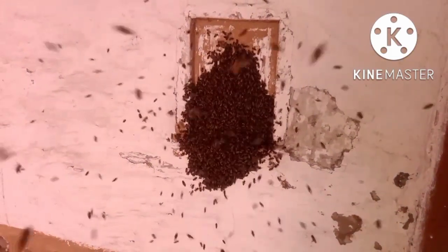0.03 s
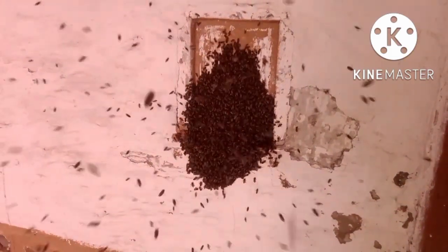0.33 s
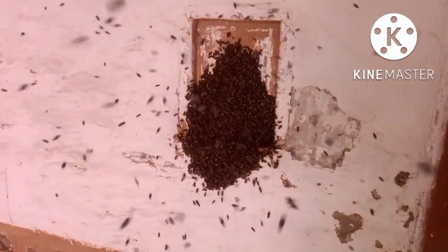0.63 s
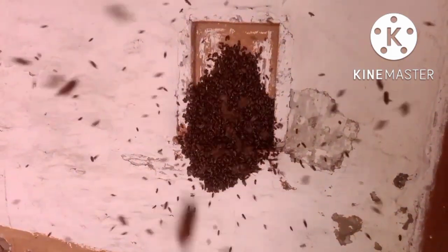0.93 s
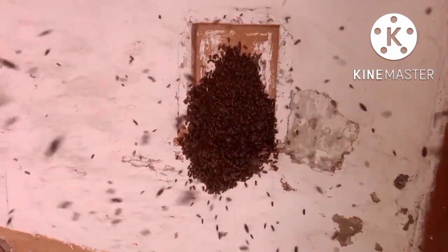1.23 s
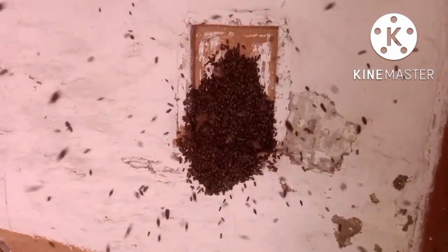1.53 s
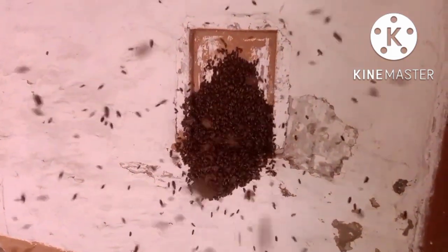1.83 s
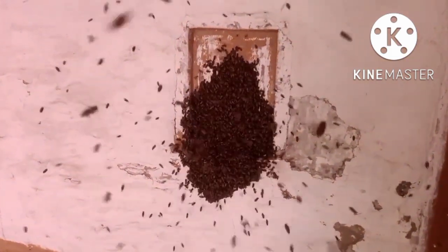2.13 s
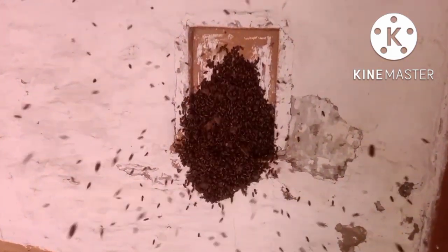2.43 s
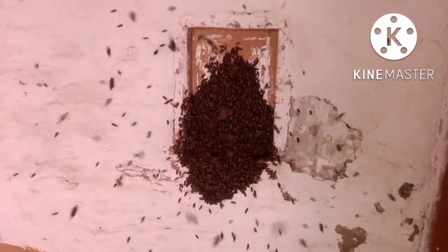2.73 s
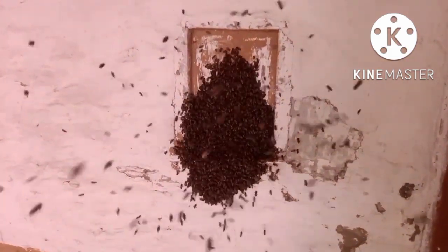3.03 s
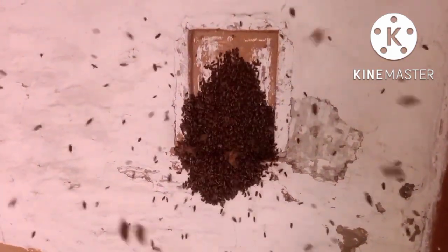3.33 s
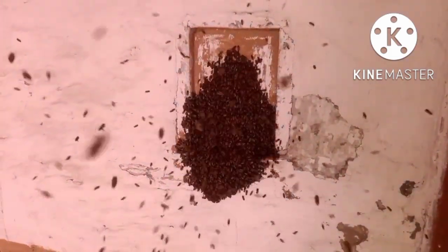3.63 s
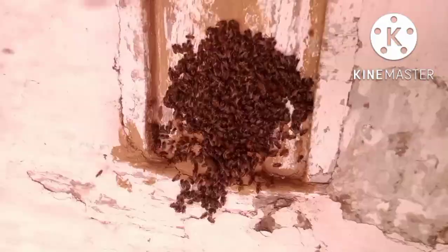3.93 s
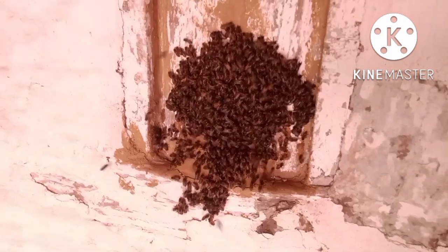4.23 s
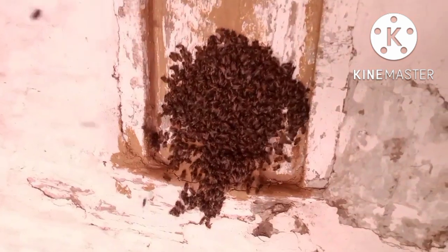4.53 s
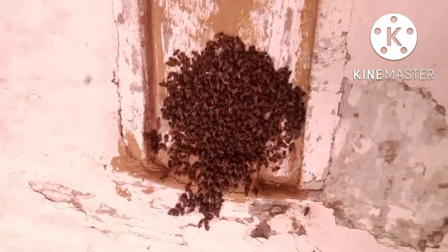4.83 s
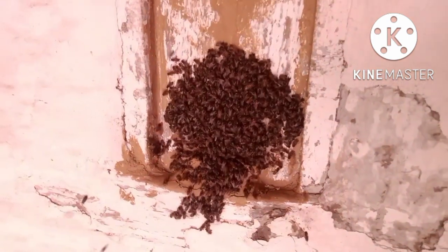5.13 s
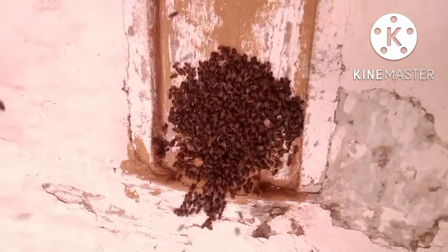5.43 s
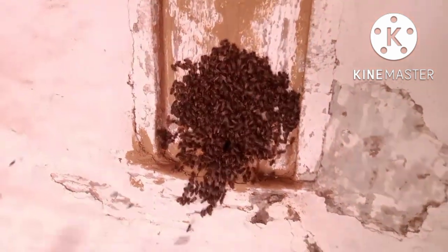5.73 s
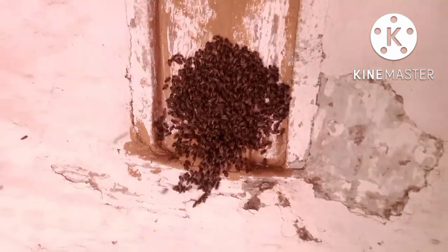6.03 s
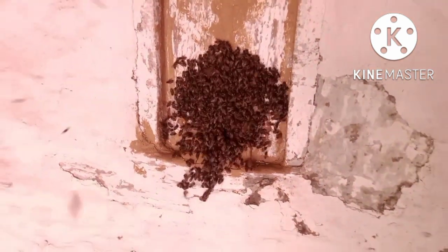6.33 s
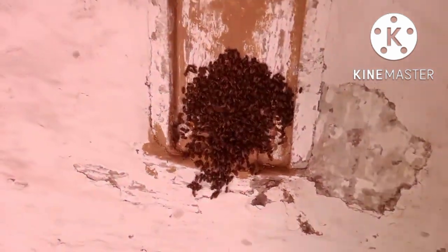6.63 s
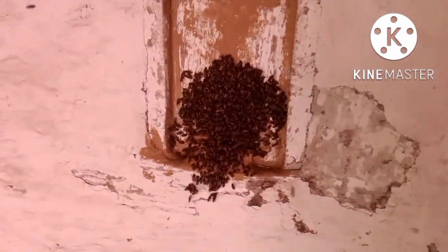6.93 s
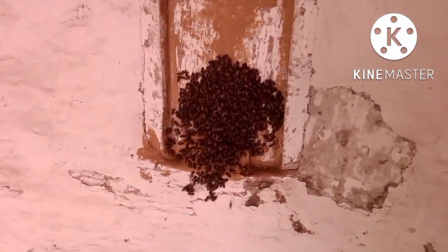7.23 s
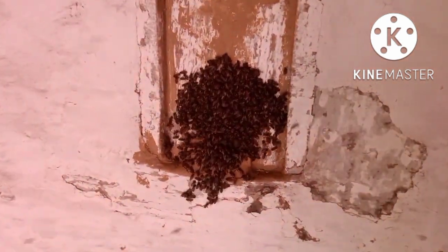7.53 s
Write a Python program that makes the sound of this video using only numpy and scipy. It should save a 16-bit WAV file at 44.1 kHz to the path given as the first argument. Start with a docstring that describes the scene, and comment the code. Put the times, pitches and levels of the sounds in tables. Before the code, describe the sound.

Outdoors by a wall, dozens of bees blend into one wavering drone with a raspy buzz on top. Single bees whine past in quick swells, and two graze the microphone with a small hiss and a low bump. Near the middle the buzzing cuts out for an instant, then returns softer and carries on with smaller swells. Low, faint outdoor air lies underneath.

```python
"""A swarm of honeybees hums around its cluster on a house wall.
Dozens of wingbeats, each at its own wandering rate, superpose into a tone, its octave and a raspy buzz.
The hum swells often, a few times with a close bee's whine or hiss; twice wing wash bumps the microphone.
Near 4 s the sound breaks off and fades back in with the swarm quieter. Outdoor air murmurs beneath."""
import sys
import numpy as np
from scipy import signal
from scipy.fft import rfft, irfft, next_fast_len
from scipy.io import wavfile

SR = 44100
rng = np.random.default_rng(int(sys.argv[2]) if len(sys.argv) > 2 else 0)


def transcribe(signal):
    """Save signal, clipped to [-1, 1], as a 16-bit WAV file at the path in sys.argv[1]."""
    frames = np.atleast_2d(signal).T
    limited = np.clip(frames, -1, 1)
    pcm = np.round(limited * 32767).astype(np.int16)
    wavfile.write(sys.argv[1], SR, pcm)


N = 339129
STEP = 16  # audio samples per point of the slow flight curves
TIME = np.arange(N) / SR
SLOW_TIME = np.arange(N // STEP + 2) * STEP / SR
CHANGE_S = 3.98  # the loud first part gives way to the quiet second part

# Hum of the crowd: time_s, tone_db, octave_db
HUM_LEVELS = [(0, -36.5, -32), (1.7, -34, -31), (2.3, -35.5, -33), (2.65, -33, -30.5), (3.9, -37, -32.5),
              (4.2, -44.5, -38.5), (5.4, -42.5, -38.5), (6.1, -45.5, -39.5), (7.69, -42, -40.7)]
# Loudest swells of the swarm's hum, a few with a close bee's whine:
# centre_s, pitch_hz, half_length_s, tone_db, octave_db, whine_db
HUM_SWELLS = [ (0.421, 280, 0.02, -33.5, -30, -46), (0.51, 280.3, 0.021, -29, -27.5, -48),
              (0.629, 283, .025, -33, -33, -49), (1.10, 281.6, 0.014, -27.5, -36.5, -38),
              (1.23, 283, 0.029, -49, -39, -38), (1.42, 276, .025, -30, -34, -42),
              (1.502, 275.8, .028, -31, -27, -38), (1.672, 281, 0.035, -30, -28.5, -41),
              (1.909, 262, 0.023, -23.5, -29, -47), (2.019, 268, .025, -22, -34, -36),
              (2.079, 278, .03, -27, -29, -37), (2.472, 279.5, 0.024, -28.5, -28.5, -45),
              (2.598, 277, 0.017, -39, -25, -47), (2.909, 278.6, 0.026, -21, -23.5, -29),
              (2.972, 286, 0.018, -23, -26, -39), (3.209, 286, 0.025, -25.5, -35, -45),
              (3.29, 279, .02, -42, -28, -44), (3.699, 277, 0.014, -31, -27.5, -47),
              (3.847, 285.2, 0.024, -29.5, -32, -39), (4.45, 279, 0.021, -37, -32.5, -52),
              (4.68, 272, 0.031, -40.5, -34, -47), (5.051, 275.6, 0.02, -49, -37, -49),
              (5.31, 284, .035, -38, -42, -48), (5.439, 275.4, 0.016, -42, -33.5, -50),
              (5.768, 282, 0.02, -31, -43, -44), (5.959, 274, 0.03, -38, -40, -50),
              (6.039, 280, .03, -50, -37.5, -42), (6.327, 283, 0.025, -37, -33, -51),
              (6.669, 280, 0.026, -36, -40, -53), (6.899, 272, 0.023, -45, -36.5, -50),
              (7.021, 282, .045, -37.5, -43, -56), (7.662, 282, 0.023, -35.5, -38, -46), ]
# Overtones of the whine: harmonic_number, relative_db
WHINE_OVERTONES = [(3, 0), (4, 0), (5, 5), (6, -1), (7, -10), (8, -5), (9, -16), (10, -13), (11, -21),
                   (12, -14)]
# Rasp of the wings: time_s, buzz_db, fizz_db
RASP_LEVELS = [(0, -30, -51.5), (3.9, -30, -51), (4.2, -37, -56.5), (4.9, -36.5, -56), (5.8, -37.5, -57.5),
               (7.69, -38, -58.3)]
# Midrange spectrum of the wing strokes in each part: frequency_hz, relative_db
BUZZ_FIRST = [(700, -2), (830, -2.5), (1100, -1), (1400, 0), (1700, -2.5), (2000, -3.5), (2600, -6),
              (3600, -6.5), (4100, -11.5), (4800, -22), (5600, -43.5), (7000, -52.5)]
BUZZ_SECOND = [(700, 1.5), (830, -2.5), (1100, -2), (1450, -1), (1900, -2), (2300, -7), (3000, -7.5),
               (3800, -6), (4300, -10.5), (4900, -18.5), (5600, -35.5), (7000, -43.5)]
# Treble spectrum of the wing strokes in each part: frequency_hz, relative_db
FIZZ_FIRST = [(5000, -6), (6200, -6.5), (7200, -0.5), (8000, 1), (9000, -2.5), (10000, -6.5), (11500, -6.5),
              (12300, -7.5), (13600, -2), (14500, -11), (15400, -6.5)]
FIZZ_SECOND = [(5000, -16), (6200, -11.5), (7200, 0), (8000, 1.5), (9200, 0.5), (10000, -3.5),
               (11300, -5.5), (12200, -12), (13600, -3), (14500, -13), (15400, -4.5)]
# Hiss of bees grazing the microphone: centre_s, level_db, half_length_s, brightest_hz
WING_SWISHES = [(1.97, -51.5, .05, 10000), (2.91, -54, .025, 8500), (6.27, -63, .085, 13000)]
# Wing wash pulses, before the port's leak: centre_s, peak_db, centre_to_peak_s
WASH_PUFFS = [(1.942, -17.5, 0.00093), (1.9604, -25, 0.00075), (1.9735, -36, .0015), (1.984, -40, 0.0017),
              (2.013, -36, .0012), (2.9122, -33, .0014), (2.926, -13.5, 0.0015)]
# Spectrum of the outdoor air in each part: frequency_hz, relative_db
AIR_FIRST = [(20, -34), (45, -13), (80, -3), (120, -5.5), (200, 5.5), (370, 4), (700, 2.5), (1500, -34)]
AIR_SECOND = [(20, -26), (45, -13), (80, -3), (120, 0.5), (200, -1), (370, 1), (700, -6), (1500, -29)]


def flight(usual_hz=271, spreads_hz=(16.2, 17.5), sag_hz=1.6, nearness_db=3.5, bees=80):
    """Random modulation: effort sets each bee's wingbeat rate and phase, nearness its amplitude."""
    cruise, dart, jitter = wander(.35, bees), wander(3.5, bees), wander(22.03, bees)
    effort = unit_rms(cruise + .65 * dart + .12 * jitter)
    spread_hz = np.where(SLOW_TIME < CHANGE_S, *spreads_hz)
    beat_hz = usual_hz + spread_hz * effort - sag_hz * effort ** 2  # wings slow more easily than speed up
    cycles = np.cumsum(beat_hz, axis=1) * STEP / SR + rng.random((bees, 1))
    return beat_hz, cycles, gain_of(nearness_db * wander(2.2, bees))


def hum(beat_hz, cycles, amplitude, hover_hz=285, hover_width_hz=11):
    """Beating: wingbeats of nearly equal frequency interfere, so the tone and its octave throb."""
    tone_db, octave_db = follow(HUM_LEVELS)
    swell_tone, swell_octave, whine = hum_swells()
    throb_db = 1.5 * drift(rate_hz=5)
    hovering = 1 / np.hypot(1, (beat_hz - hover_hz) / hover_width_hz)  # hovering bees hum loudest
    vigour = (beat_hz / hover_hz) ** 1.9  # faster wings throw a stronger octave
    crowd_tone = chorus(cycles, amplitude * hovering, settle_s=.077)
    crowd_octave = chorus(2 * cycles, amplitude * vigour, settle_s=.069)
    tone = hum_partial(crowd_tone, tone_db + throb_db, swell_tone, coherent_share=.9)
    octave = hum_partial(crowd_octave, octave_db, swell_octave, coherent_share=.53)
    return tone + octave + whine


def chorus(cycles, amplitude, settle_s):
    """Superposition of one partial from every bee: fast beats remain, slow swells are levelled."""
    phasor = (amplitude * np.exp(2j * np.pi * (cycles % 1).astype(np.float32))).sum(axis=0)
    window = signal.windows.hann(2 * int(settle_s * SR / STEP) + 1)
    weight = signal.convolve(np.ones(len(phasor)), window, "same")
    power = signal.convolve(abs(phasor) ** 2, window, "same") / weight
    return unit_rms(signal.resample_poly(phasor.real / np.sqrt(power), STEP, 1)[:N])


def hum_partial(crowd, crowd_db, swell, coherent_share, takeover=.58):
    """Addition of powers: the crowd yields to a swell, which is part pure tone and part chorus."""
    level = gain_of(crowd_db)
    yielded = level / np.hypot(1, takeover * abs(swell) / level)
    diffuse = np.sqrt(yielded ** 2 + (1 - coherent_share) * abs(swell) ** 2)
    return crowd * diffuse + np.sqrt(2 * coherent_share) * swell.real


def hum_swells(glide=.00785):
    """Gaussian tone bursts: the hum's loudest beats, with octave and whine, sink slightly in pitch."""
    tone, octave, whine = np.zeros((3, N), complex)
    waver_hz = 3.5 * drift(rate_hz=16)
    for centre_s, pitch_hz, half_length_s, tone_db, octave_db, whine_db in HUM_SWELLS:
        span = abs(TIME - centre_s) < .25
        progress = (TIME[span] - centre_s) / half_length_s
        swell = np.exp(-.5 * progress ** 2)
        heard_hz = pitch_hz * (1 - glide * np.tanh(progress)) + waver_hz[span]
        phase = 2 * np.pi * (np.cumsum(heard_hz) / SR + rng.random())
        tone[span] += gain_of(tone_db) * swell * np.exp(1j * phase)
        octave[span] += gain_of(octave_db) * swell * np.exp(2j * phase)
        overtones = sum(gain_of(db) * np.sin(harmonic * phase + 2 * np.pi * rng.random())
                        for harmonic, db in WHINE_OVERTONES)
        whine[span] += gain_of(whine_db) * swell * unit_rms(overtones)
    return tone, octave, whine.real


def rasp(snaps):
    """Spectral shaping: the snaps' upper harmonics and stirred air give a buzz, with a faint fizz above."""
    buzz_db, fizz_db = follow(RASP_LEVELS)
    rush = .33 * rng.standard_normal(N)
    wings = unit_rms(snaps) + rush
    buzz = by_part(coloured(wings, BUZZ_FIRST, low_hz=555), coloured(wings, BUZZ_SECOND, low_hz=575))
    fizz = by_part(coloured(snaps, FIZZ_FIRST, low_hz=4960), coloured(snaps, FIZZ_SECOND, low_hz=5014))
    flicker_db = .5 * drift(rate_hz=14)  # the fizz flickers as the nearest bees turn
    return gain_of(buzz_db) * buzz + gain_of(fizz_db + flicker_db) * fizz


def wing_snaps(cycles, amplitude, snap_shapes=10):
    """Convolution: each bee's wingbeats are impulses that take one of ten random snap shapes."""
    trains = np.zeros((snap_shapes, N + 2 * STEP + 2))
    for bee, (beats, strength) in enumerate(zip(cycles, amplitude)):
        stroke_s = np.interp(np.arange(np.ceil(beats[0]), beats[-1]), beats, SLOW_TIME)
        height = np.interp(stroke_s, SLOW_TIME, strength)
        sample, fraction = (stroke_s * SR).astype(int), stroke_s * SR % 1
        trains[bee % snap_shapes, sample] += height * (1 - fraction)
        trains[bee % snap_shapes, sample + 1] += height * fraction
    return sum(signal.oaconvolve(train, wing_stroke())[:N] for train in trains)


def wing_stroke(smear_s=.005012, snap_s=.001226, sharp_above_hz=5000, size=512):
    """Scattering by the wall smears the midrange of one snap in time; the treble stays sharp."""
    hz = np.arange(size // 2 + 1) * SR / size
    spread_s = snap_s + smear_s / (1 + (hz / sharp_above_hz) ** 4)
    group_delay_s = spread_s * rng.random(len(hz))
    return irfft(np.exp(-2j * np.pi * np.cumsum(group_delay_s) * SR / size))


def swishes(beat_hz=272, depth=.7):
    """Amplitude modulation: air hisses off the wings of a grazing bee once in every beat."""
    out = np.zeros(N)
    for centre_s, level_db, half_length_s, brightest_hz in WING_SWISHES:
        spectrum = [(.7 * brightest_hz, -9), (brightest_hz, 0), (1.5 * brightest_hz, -5)]
        hiss = coloured(rng.standard_normal(N), spectrum, low_hz=6000)
        swell = np.exp(-.5 * ((TIME - centre_s) / half_length_s) ** 2)
        out += gain_of(level_db) * swell * hiss
    return out * unit_rms(1 + depth * np.cos(2 * np.pi * beat_hz * TIME))


def wing_wash(port_hz=62):
    """Pressure pulses push, then pull the microphone diaphragm; its port leaks as a high-pass filter."""
    pressure = np.zeros(N)
    for centre_s, peak_db, centre_to_peak_s in WASH_PUFFS:
        progress = np.clip((TIME - centre_s) / centre_to_peak_s, -40, 40)
        pressure -= gain_of(peak_db) * progress * np.exp(1 - abs(progress))
    return signal.sosfilt(signal.butter(3, port_hz, "high", fs=SR, output="sos"), pressure)


def outdoor_air(first_db=-47, second_db=-50):
    """Filtered noise: the low murmur of the outdoors, steady within each part."""
    noise = rng.standard_normal(N)
    return by_part(gain_of(first_db) * coloured(noise, AIR_FIRST),
                   gain_of(second_db) * coloured(noise, AIR_SECOND))


def gain_of(db):
    """Decibels as an amplitude ratio."""
    return 10 ** (np.asarray(db) / 20)


def unit_rms(x):
    """Normalisation to rms 1."""
    return x / np.sqrt(np.mean(abs(x) ** 2) + 1e-20)


def follow(rows):
    """Linear interpolation of a table's level columns at every sample."""
    time_s, *columns = np.transpose(rows)
    return [np.interp(TIME, time_s, column) for column in columns]


def coloured(x, spectrum, low_hz=10):
    """Filtering by a spectrum, with a steep cutoff below low_hz; the result has rms 1."""
    size = next_fast_len(N)
    hz = np.arange(size // 2 + 1) * SR / size + 1
    frequency_hz, relative_db = np.transpose(spectrum)
    gain = gain_of(np.interp(np.log(hz), np.log(frequency_hz), relative_db))
    gain /= np.sqrt(1 + (low_hz / hz) ** 40)
    return unit_rms(irfft(rfft(x, size) * gain, size)[:N])


def by_part(first, second):
    """Switching from one signal to the other at CHANGE_S."""
    return np.where(TIME < CHANGE_S, first, second)


def wander(rate_hz, count):
    """Low-pass Gaussian noise: count smooth random curves on SLOW_TIME, of overall rms 1."""
    size = next_fast_len(len(SLOW_TIME))
    hz = np.arange(size // 64) * SR / STEP / size
    spectra = rng.standard_normal((count, len(hz), 2)) @ [1, 1j]
    return unit_rms(irfft(spectra * np.exp(-.5 * (hz / rate_hz) ** 2), size)[:, :len(SLOW_TIME)])


def drift(rate_hz):
    return np.interp(TIME, SLOW_TIME, wander(rate_hz, 1)[0])


def scene():
    """Superposition of all sources; the same flight drives the hum and the rasp."""
    beat_hz, cycles, amplitude = flight()
    swarm = hum(beat_hz, cycles, amplitude) + rasp(wing_snaps(cycles, amplitude))
    return (swarm + swishes() + wing_wash() + outdoor_air())[None]


def record(dry, dip_start_s=3.865, dip_s=.061, dip_db=-6, stop_s=3.939, stop_ramp_s=.007,
           return_s=4.009, fade_in_s=.22, floor_db=-65, cutoff_hz=15500):
    """Gain envelope and band limit: the first part dips and stops, then the second fades in."""
    dip = gain_of(dip_db * np.clip((TIME - dip_start_s) / dip_s, 0, 1))
    stop = np.clip((stop_s - TIME) / stop_ramp_s + .5, 0, 1)
    fade_in = np.clip((TIME - return_s) / fade_in_s, 0, 1) ** 1.97
    envelope = by_part(dip * stop, fade_in) + gain_of(floor_db)
    low_pass = signal.firwin(767, cutoff_hz, window=("kaiser", 9), fs=SR)
    return signal.oaconvolve(dry * envelope, low_pass[None], "same")


dry = scene()
out = record(dry)
transcribe(out)
```